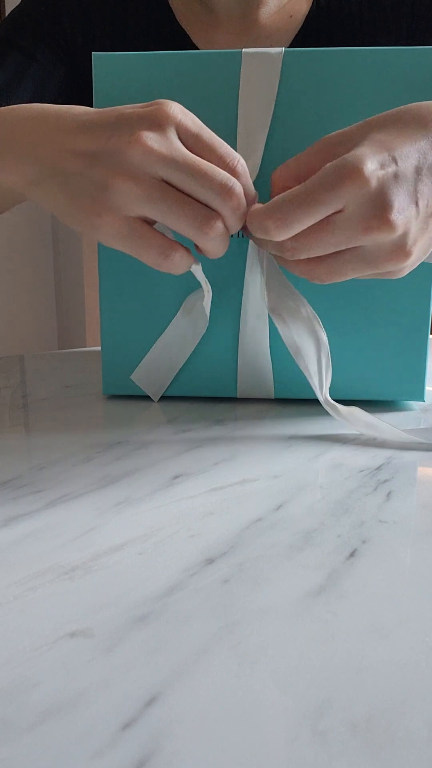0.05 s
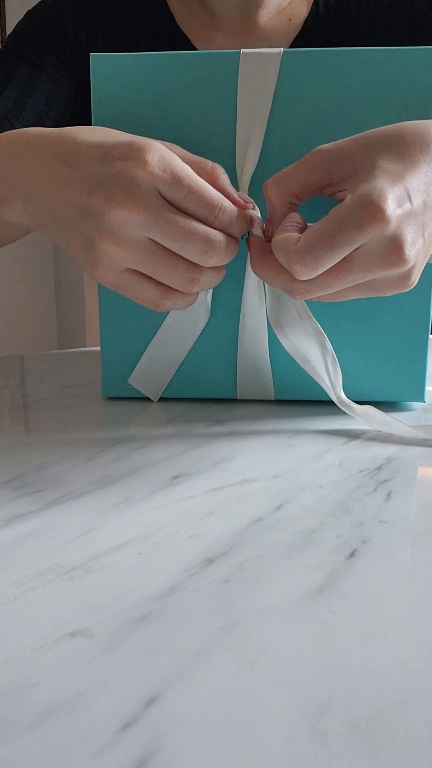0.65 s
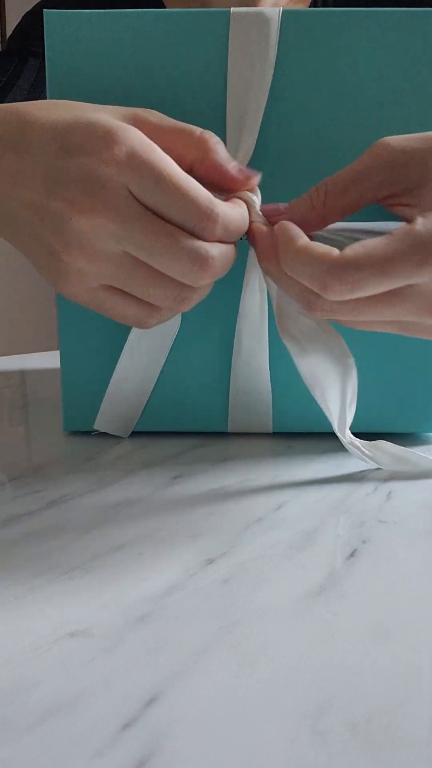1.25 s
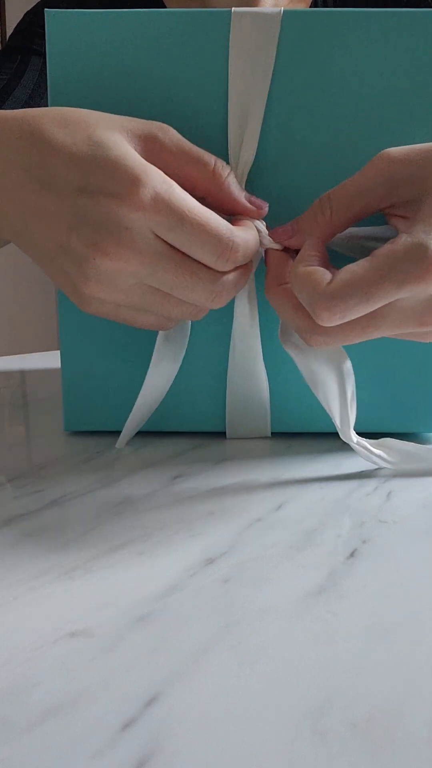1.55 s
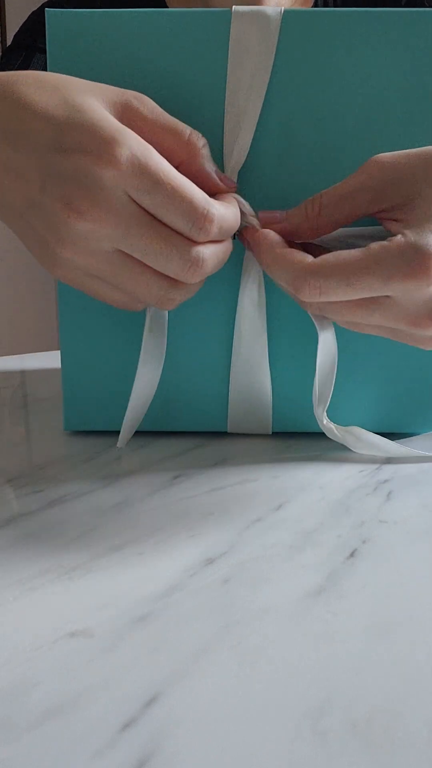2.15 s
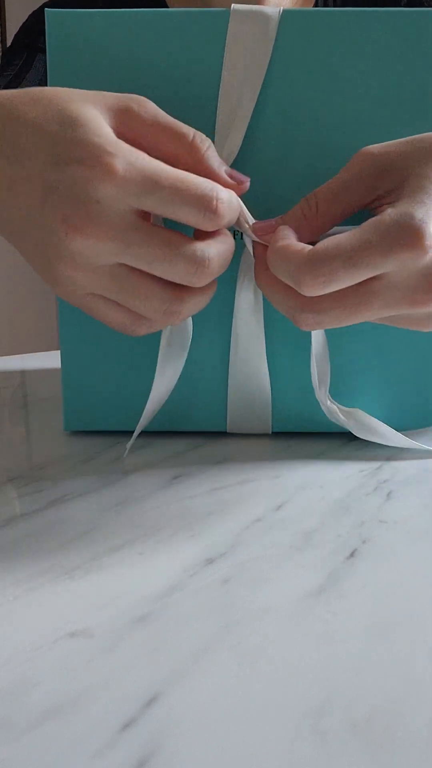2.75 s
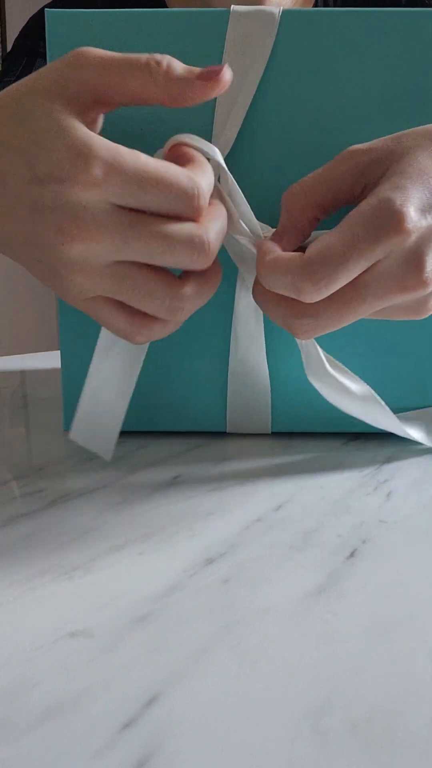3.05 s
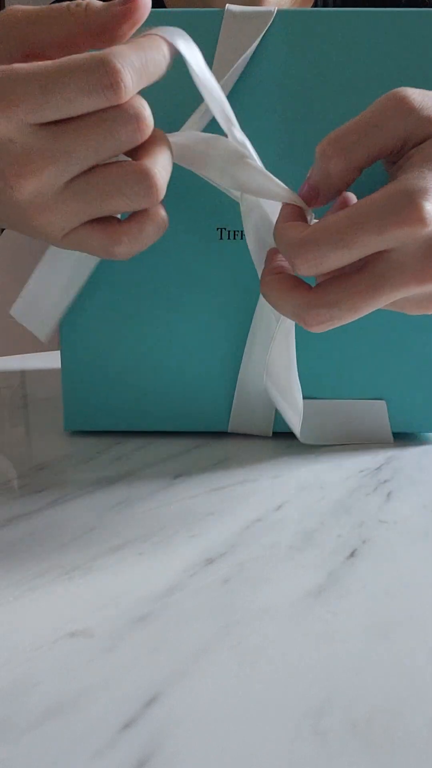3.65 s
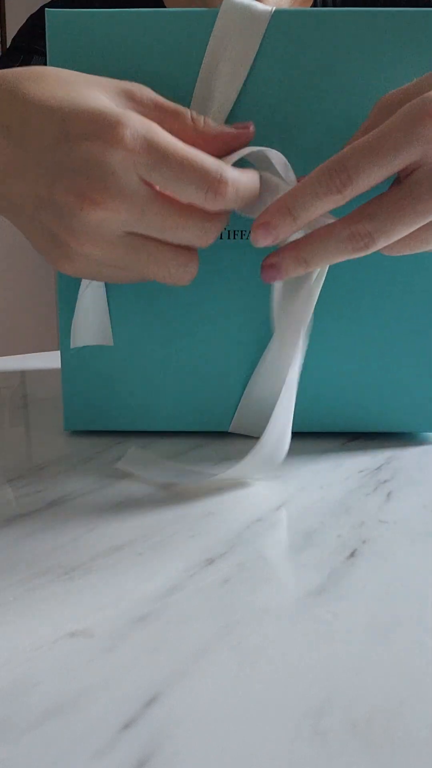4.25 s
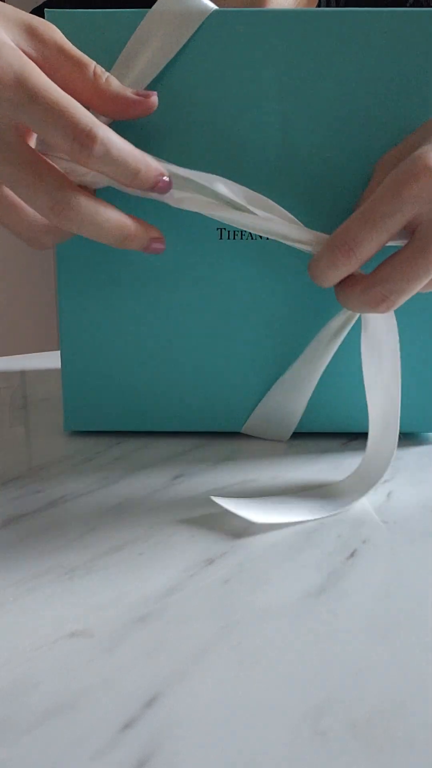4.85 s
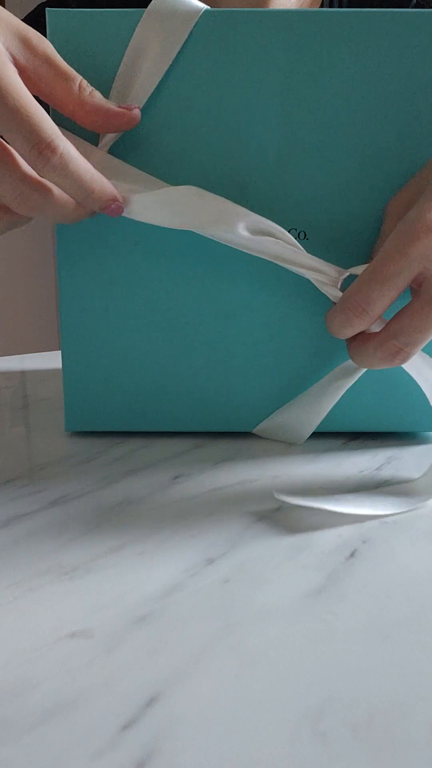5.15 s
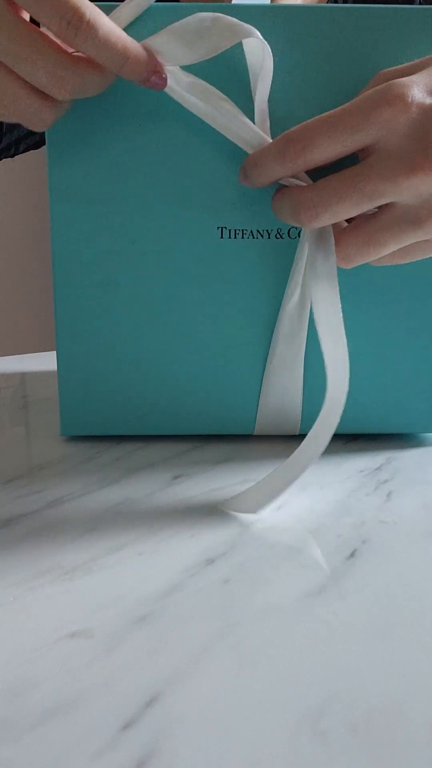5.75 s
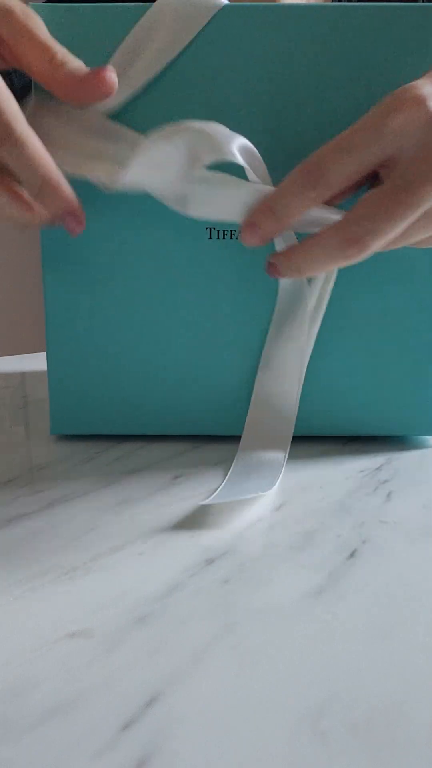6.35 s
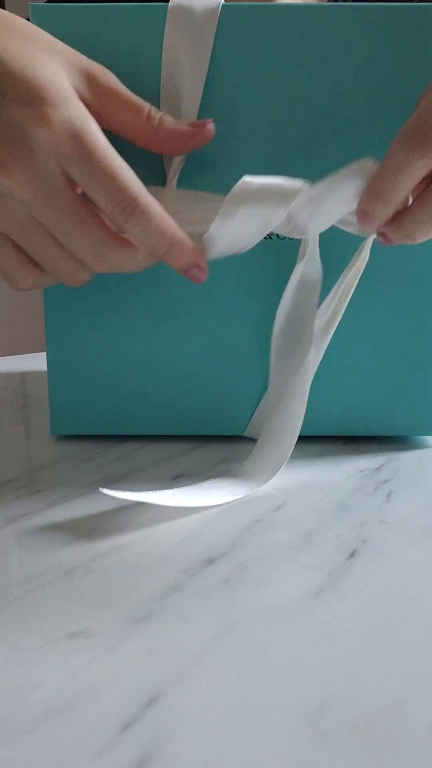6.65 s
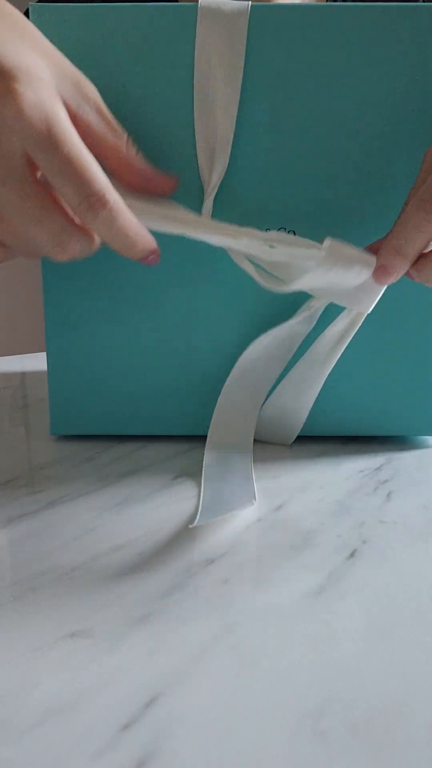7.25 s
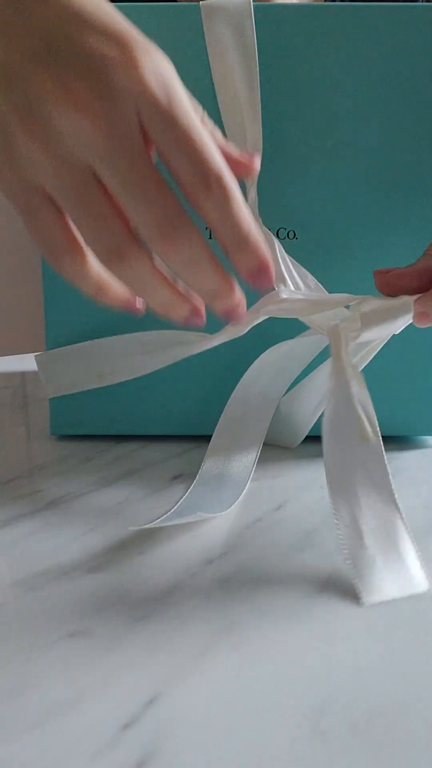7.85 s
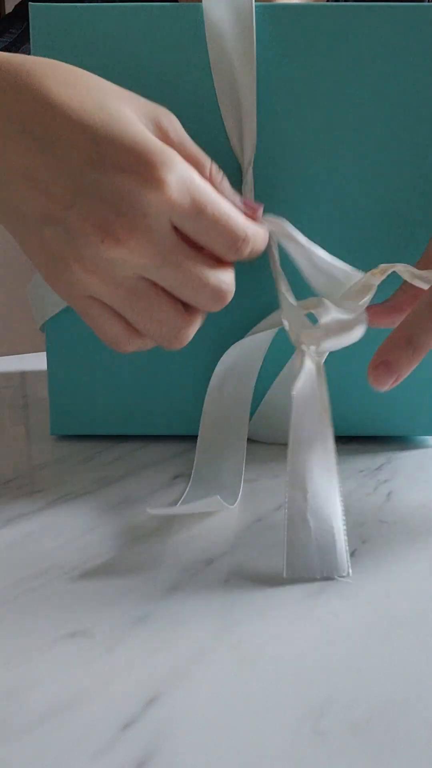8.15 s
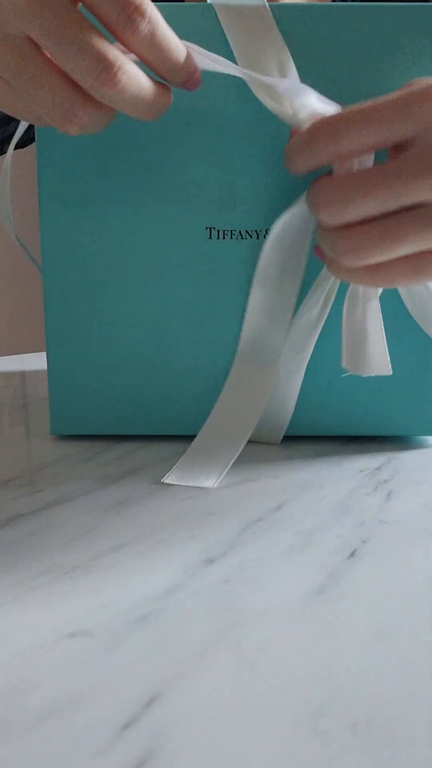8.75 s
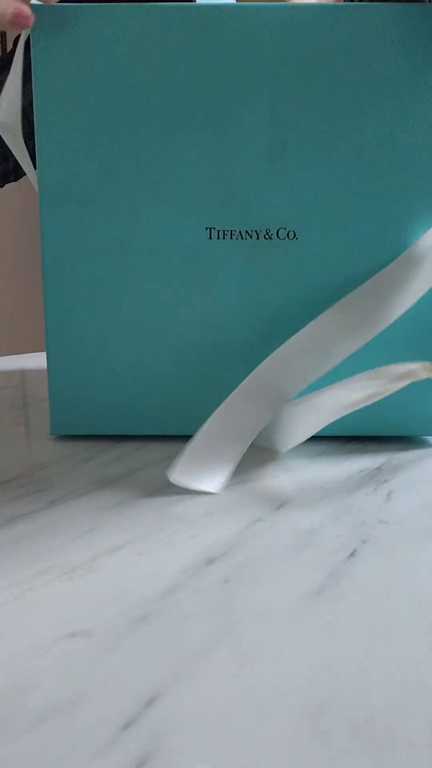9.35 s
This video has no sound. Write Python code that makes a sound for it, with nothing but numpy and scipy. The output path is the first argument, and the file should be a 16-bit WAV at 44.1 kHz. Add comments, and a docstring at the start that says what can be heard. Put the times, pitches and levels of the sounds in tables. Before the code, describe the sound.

A satin ribbon rustles and zips as it is untied, with light knocks and scuffs from a cardboard box over a soft fan.

```python
"""Untying a ribbon on a gift box

Fingers pick open the knot of a satin ribbon on a cardboard box that stands on a stone table in a
small room. Sliding friction makes the ribbon hiss and zip through the knot. Tugs and fingernails
excite the modes of the hollow box, which knocks, ticks and stutters; stick-slip motion makes it
scuff and creak. Behind it all a ventilation fan murmurs, broadband air noise with duct resonances."""
import sys
import numpy as np
from scipy import signal
from scipy.fft import rfft, irfft, next_fast_len
from scipy.io import wavfile

SR = 44100
rng = np.random.default_rng(int(sys.argv[2]) if len(sys.argv) > 2 else 0)


def to_wav(sig):
    """Store sig (one row per channel, or 1-D mono) as 16-bit WAV at the path in sys.argv[1].

    Samples outside -1..1 are clipped; the rate is SR.
    """
    pcm = np.clip(np.atleast_2d(sig), -1, 1) * 32767
    pcm = np.round(pcm).astype(np.int16)
    wavfile.write(sys.argv[1], SR, pcm.T)  # frames by channels


N = 418509


def from_db(db):
    """Amplitude ratio of a level in decibels."""
    return 10 ** (np.asarray(db) / 20)


def unit_rms(x):
    """Normalisation to an rms of 1."""
    return x / np.sqrt(np.mean(x ** 2) + 1e-20)


def at_hz(points, hz):
    """Linear interpolation of a spectrum over log frequency."""
    f, value = np.transpose(points)
    return np.interp(np.log(hz + 1e-3), np.log(f), value)


def shaped(x, gain_at):
    """Zero-phase filtering by a gain given as a function of frequency."""
    n = next_fast_len(x.shape[-1] + 256)
    hz = np.arange(n // 2 + 1) * SR / n
    return irfft(rfft(x, n) * gain_at(hz), n)[..., :x.shape[-1]]


def coloured(x, spectrum):
    """Spectral shaping by a table of gains, normalised to an rms of 1."""
    return unit_rms(shaped(x, lambda hz: from_db(at_hz(spectrum, hz))))


def bandpass(x, low_hz, high_hz, order=2):
    """Maximally flat band-pass filtering."""
    return signal.sosfilt(signal.butter(order, [low_hz, high_hz], "band", fs=SR, output="sos"), x)


def resonate(x, hz, width_hz):
    """Second-order resonance with unit gain at its peak."""
    r = np.exp(-np.pi * width_hz / SR)
    feedback = [1, -(1 + r * r) * np.cos(2 * np.pi * hz / SR), r * r]
    return signal.lfilter(np.array([1, 0, -1]) * (1 - r * r) / 2, feedback, x)


def drift(per_s):
    """Random modulation with an rms of 1, gliding to per_s new values a second."""
    count = int(N * per_s / SR) + 2
    values = rng.standard_normal(N // 8)[:count]
    return unit_rms(np.interp(np.arange(N) * per_s / SR, np.arange(count), values))


def swell(n, skew=0.5):
    """Half-sine envelope; a skew below 1 brings the peak forward."""
    return np.sin(np.pi * np.linspace(0, 1, n, endpoint=False) ** skew)


def add(track, s, sound):
    """Superposition of a sound on a track, starting at s seconds."""
    i = int(round(s * SR))
    track[..., i:i + sound.shape[-1]] += sound[..., :N - i]


# Correlation of left and right in the diffuse field: (frequency [Hz], correlation [ratio])
CORRELATION = [(60, 0.64), (130, 0.97), (290, 1), (640, 0.69), (1400, 0), (15000, 0.035)]

def diffuse(n):
    """Diffuse field: long waves reach both ears alike, short waves are uncorrelated."""
    mid, side = rng.standard_normal((2, n))
    mid = shaped(mid, lambda hz: np.sqrt(1 + at_hz(CORRELATION, hz)))
    side = shaped(side, lambda hz: np.sqrt(1 - at_hz(CORRELATION, hz)))
    return np.array([mid + side, mid - side])


# Spectrum of the rushing air: (frequency [Hz], relative level [dB])
AIR_SPECTRUM = [(25, -10), (45, -3), (70, -17), (105, -2.5), (198, -0.5), (509, -10.5), (804, -9.5),
                (1050, -14), (1400, -17.5), (2420, -23), (3530, -28.5), (4300, -24.5), (5900, -34),
                (15500, -37.5)]
# Resonances of the duct: (frequency [Hz], bandwidth [Hz], relative level [dB])
DUCT_MODES = [(209.2, 10.7, -56), (310, 100, -61.5), (625, 13.6, -65), (867, 5.8, -57.5), (2330, 165, -67)]

def fan(air_db=-49.0, waver_db=0.5, left_db=-1.5, right_db=1.0):
    """Flow noise: a nearly steady broadband rush, with narrow bands from duct resonance."""
    air = from_db(air_db + waver_db * drift(per_s=12)) * coloured(diffuse(N), AIR_SPECTRUM)
    flow = diffuse(N)
    duct = sum(from_db(db) * unit_rms(resonate(flow, hz, width_hz)) for hz, width_hz, db in DUCT_MODES)
    return (air + duct) * from_db([[left_db], [right_db]])


LEFT_LAG_SAMPLES = 14   # sound from the right reaches the left ear later
# Spectrum of the wall reflections: (frequency [Hz], relative level [dB])
WALL_SPECTRUM = [(60, 9), (200, 6), (500, -1.5), (1200, 1.5), (3000, 5), (8000, 10.5), (15000, 1.5)]

def room(x, near_db=-9.5, tail_db=-9.5, near_s=0.013, t60_s=0.58, gap_s=0.0037):
    """Reverberation: direct sound, a cluster of early reflections, then an exponential tail."""
    t = np.arange(SR // 2) / SR
    arrived = t > gap_s
    near = arrived / (1 + (t / near_s) ** 8)
    tail = arrived * from_db(-60 * t / t60_s)
    envelope = np.hypot(from_db(near_db) * unit_rms(near), from_db(tail_db) * unit_rms(tail))
    response = coloured(diffuse(len(t)), WALL_SPECTRUM) * envelope / np.sqrt(len(t))
    response[0, LEFT_LAG_SAMPLES] += 1
    response[1, 0] += 1
    return signal.fftconvolve(x[None], response, axes=1)[:, :N]


# Level difference between the ears: (frequency [Hz], right over left [dB])
EAR_DIFFERENCE = [(60, 2), (110, 4), (200, 1.5), (380, 1), (550, 6.5), (750, 9.5), (1050, 4), (1400, 9),
                  (2400, 6), (4400, 6.5), (8000, 1), (15000, 3.5)]

def to_the_right(x):
    """Interaural level difference: half is taken from the left ear, half given to the right."""
    return shaped(x, lambda hz: from_db(at_hz(EAR_DIFFERENCE, hz) * [[-.5], [.5]]))


# The hands tilt the box on the table: (time [s], duration [s], level [dB])
BOX_TILTS = [(0.564, 0.19, -51), (1.47, 0.11, -46), (1.915, 0.3, -49.5), (2.327, 0.19, -53),
             (4.147, 0.11, -48), (5.102, .035, -45.5), (6.597, .05, -49), (8.498, 0.12, -47)]

def rumble(force, push_db=-29.0, settle_s=0.012, exponent=0.6):
    """Forced vibration: low noise swells with each tilt and follows the rms force on the box."""
    r = np.exp(-1 / (settle_s * SR))
    push = np.sqrt(signal.lfilter([1 - r], [1, -r], force ** 2 + 1e-18))
    envelope = from_db(push_db) * push ** exponent
    for s, length, db in BOX_TILTS:
        add(envelope, s, from_db(db) * swell(int(length * SR)))
    return envelope * unit_rms(bandpass(rng.standard_normal(N), low_hz=66.4, high_hz=118.0))


# Hard tugs make the box stutter on the table: (time [s], thump level [dB], relative crack level [dB],
# panel frequency [Hz], hops [count], gap [s], loss per hop [dB])
STUTTERS = [(1.4872, -17.5, -35, 209, 2, 0.0091, 4), (1.5497, -15.5, -37, 240, 5, .0138, 1.0),
            (4.2484, -18, -29, 365, 3, 0.008, 2.5), (5.544, -16, -25.5, 224, 3, .0140, 2),
            (5.7836, -24.5, -37.5, 318, 3, 0.01025, 1.5), (5.8713, -26, -43, 245, 5, 0.015, 2),
            (9.072, -29, -31, 430, 3, 0.0071, 0)]

def hops(gap_spread=0.05):
    """Repeated impact: contacts at slightly uneven intervals, with a set loss from one to the next."""
    contacts = []
    for s, thump_db, edge_db, panel_hz, count, gap_s, loss_db in STUTTERS:
        for k in range(int(count)):
            contacts.append((s, thump_db - k * loss_db, edge_db - k * loss_db, panel_hz))
            s += gap_s * (1 + gap_spread * rng.standard_normal())
    return contacts


# Single blows on the box: (time [s], thump level [dB], relative crack level [dB], panel frequency [Hz])
BLOWS = [(0.603, -34.5, -43.5, 233), (1.416, -48, -43.5, 420), (1.539, -22, -42, 230),
         (1.815, -36, -48, 248), (1.911, -40, -39, 470), (2.346, -42, -47, 190), (3.2017, -23, -40.5, 210),
         (3.2598, -39, -35.5, 354), (3.2678, -31, -43, 268), (3.294, -26.5, -49, 229),
         (3.3395, -31, -42, 249), (4.170, -37.5, -48, 168), (4.2397, -10, -21.5, 232),
         (4.322, -30, -58, 235), (5.1086, -25, -24, 320), (5.432, -26.5, -36, 211),
         (5.485, -52, -37.5, 450), (5.6095, -53, -32, 300), (5.7598, -22, -38, 251),
         (5.946, -27.5, -40, 165), (6.278, -38, -36, 450), (6.4823, -25, -30.5, 359),
         (6.6172, -20.5, -30.5, 387), (7.886, -51, -43.5, 217), (8.012, -53, -47, 450)]
# Spectrum of the crack from the card's edge: (frequency [Hz], relative level [dB])
CRACK_SPECTRUM = [(60, -39), (200, -38), (500, 7), (1050, 4), (1550, -3.5), (2000, -8.5), (2750, -3),
                  (3500, -20.5), (4600, -5), (6500, -25), (9500, -26), (15000, -35)]

def knocks(crack_s=0.0053, crack_db=-1.0, ring_db=-9.5, t60_s=0.059, crest_s=0.0012, n=8192):
    """Impact excitation: a blow or hop heaves a panel, sets it ringing and cracks at the card's edge."""
    force, t = np.zeros(N), np.arange(n) / SR
    for s, thump_db, edge_db, panel_hz in list(BLOWS) + hops():
        # a smaller, stiffer panel gives a higher thump
        heave = bandpass(signal.unit_impulse(n), 0.52 * panel_hz, 1.836 * panel_hz, order=3)
        envelope = np.minimum(t / crest_s, 1) * from_db(-60 * t / t60_s)
        ring = np.cos(2 * np.pi * panel_hz * (t - crest_s)) * envelope
        thump = from_db(ring_db) * ring - heave / np.abs(heave).max()
        crack = coloured(rng.standard_normal(n), CRACK_SPECTRUM) * np.exp(-t / crack_s)
        add(force, s, from_db(thump_db) * thump + from_db(edge_db + crack_db) * crack)
    return force


# The box drags on the table: (time [s], duration [s], relative level [dB], upper band edge [Hz])
DRAGS = [(1.952, 0.2, -44.5, 480), (2.958, 0.098, -46.5, 770), (3.252, 0.053, -39, 980),
         (4.77, .021, -46.5, 2480), (5.477, 0.041, -47.5, 1630), (5.68, .068, -40, 1710),
         (5.774, 0.046, -33.5, 1260), (5.852, .12, -37.5, 970), (6.044, 0.053, -46.5, 1880),
         (6.329, 0.03, -44, 2120), (6.505, 0.027, -39.5, 2160)]

def scuffs(slips_per_s=750.0, low_hz=151.0, grit=0.06, gain_db=-1.0, slide_s=0.18, slide_db=-24):
    """Irregular stick-slip: card drags alone or with a stutter; a faster drag is brighter."""
    force = np.zeros(N)
    slips = (rng.random(N) < slips_per_s / SR) * rng.uniform(0.35, 1, N)
    slips += grit * rng.standard_normal(N)
    slides = [(s, slide_s, db + slide_db, 1.79 * panel_hz) for s, db, _, panel_hz, *_ in STUTTERS]
    for s, length, db, high_hz in list(DRAGS) + slides:
        i, n = int(s * SR), int(length * SR)
        drag = unit_rms(bandpass(slips[i:i + n], low_hz, high_hz))
        add(force, s, from_db(db + gain_db) * drag * swell(n, skew=0.78))
    return force


# The taut ribbon creaks over an edge of the box: (time [s], duration [s], level [dB], resonance [Hz])
EDGE_CREAKS = [(1.554, 0.063, -38, 1140), (3.257, 0.023, -50, 1600), (4.25, 0.028, -27.5, 960),
               (4.253, 0.034, -38, 2680), (5.702, 0.038, -45.5, 1360), (6.398, 0.032, -46.5, 2110),
               (6.48, .045, -54, 1490), (9.07, 0.04, -35, 1750)]

def creaks(slips_per_s=385, jitter=0.04, uneven_db=7.0, relative_width=0.65):
    """Periodic stick-slip: under tension a nearly regular pulse train drives a resonance of the card."""
    force = np.zeros(N)
    slip_rate = slips_per_s * (1 + jitter * drift(per_s=200))
    strength = from_db(uneven_db * drift(per_s=200))
    for s, length, db, hz in EDGE_CREAKS:
        i, n, width_hz = int(s * SR), int(length * SR), relative_width * hz
        slip_count = np.floor(np.cumsum(slip_rate[i:i + n]) / SR)
        slips = np.diff(slip_count, prepend=-1) * strength[i:i + n]
        creak = unit_rms(resonate(resonate(slips, hz, width_hz), hz, width_hz))
        add(force, s, from_db(db) * creak * swell(n, skew=0.58))
    return force


# Modes of the panels and the enclosed air: (frequency [Hz], relative level [dB], 60 dB decay time [s])
BOX_MODES = [(166, -26, 0.36), (208.5, -17.5, 0.19), (244, -21, 0.073), (345, -22.5, 0.12),
             (410.4, -22, 0.16), (555.5, -21, 0.19), (677, -49, 0.1), (894, -14.5, 0.1),
             (1025, -10.5, 0.042), (1185, -15.5, 0.035), (1397, -11, 0.032), (1980, -22, 0.062),
             (2144, -21, 0.11), (2440, -31, 0.086), (2900, -29, 0.038)]

def box(force, ring_db=-29.5, spot_db=2.0, spots_per_s=12.0):
    """Modal response: the panels yield at once, then each mode rings as the touched spot allows."""
    out = force.copy()
    for hz, db, t60_s in BOX_MODES:
        r, w = from_db(-60 / (t60_s * SR)), 2 * np.pi * hz / SR
        drive = force * from_db(spot_db * drift(spots_per_s))
        mode = signal.lfilter([1, -r * np.cos(w)], [1, -2 * r * np.cos(w), r * r], drive + 1e-18)
        out += from_db(db + ring_db) * mode
    return out


def sliding_noise(direct_db):
    """Scattering: part of the noise comes straight from the right, part by way of hands, box and table."""
    direct = from_db(direct_db) * rng.standard_normal(N)
    return diffuse(N) + np.array([np.roll(direct, LEFT_LAG_SAMPLES), direct])


# Contour of the fingers' restless rustle: (time [s], level before centring and expansion [dB])
FINGER_RUSTLE = [(0.0, -76), (0.32, -73.5), (1.53, -64.5), (1.72, -68), (2.64, -73), (3.57, -63),
                 (3.86, -65), (4.57, -64.5), (4.76, -63.5), (4.97, -63), (5.84, -62.5), (7.24, -67),
                 (7.5, -65.5), (7.88, -69), (8.96, -63.5), (9.04, -61.5), (9.17, -66.5), (9.49, -69.5)]
# Ribbon is drawn over knot and card: (time [s], duration [s], rub level [dB], sheen level [dB])
RIBBON_PULLS = [(0.49, .14, -62, -65), (0.81, 0.073, -57, -59.5), (1.048, .08, -59.5, -61),
                (1.494, 0.18, -55, -59), (1.89, 0.11, -60, -60), (2.654, 0.14, -72, -60.5),
                (2.846, 0.25, -57, -56.5), (3.28, .13, -58, -58), (3.49, 0.24, -55, -54),
                (4.04, 0.16, -56, -58), (4.237, 0.06, -46.5, -52), (4.548, 0.32, -56.5, -52.5),
                (4.753, 0.2, -52, -51.5), (5.096, 0.059, -50, -47), (5.489, 0.13, -48, -50),
                (5.797, 0.27, -51.5, -54.5), (6.20, 0.1, -55.5, -54), (6.38, 0.11, -53, -53),
                (6.633, 0.15, -59.5, -58), (6.835, 0.31, -59.5, -59.5), (7.246, 0.18, -55, -54.5),
                (7.41, 0.049, -52, -53), (7.479, 0.03, -55, -58), (7.572, 0.065, -67, -58),
                (8.079, 0.087, -57.5, -55), (8.274, 0.23, -56.5, -58), (8.515, 0.2, -57, -59),
                (8.86, 0.39, -55, -50.5)]

def sliding_envelopes(rest_rub_db=-63.5, rest_sheen_db=-65.0, expansion=1.34, flick_db=2.0):
    """Incoherent addition: in both rub and sheen, each pull adds its power to the fingers' rustle."""
    times, levels = np.transpose(FINGER_RUSTLE)
    busy_db = expansion * np.interp(np.arange(N) / SR, times, levels - levels.mean())
    busy_db += flick_db * drift(per_s=14)
    power = from_db(busy_db + np.array([[rest_rub_db], [rest_sheen_db]])) ** 2
    for s, length, rub_db, sheen_db in RIBBON_PULLS:
        pull = swell(int(length * SR), skew=0.86)   # gathers speed a little faster than it loses it
        add(power, s, (from_db([[rub_db], [sheen_db]]) * pull) ** 2)
    return np.sqrt(power)


def folds(x, depth=0.25, shifts_per_s=16.0, relative_width=0.16):
    """Time-varying filtering: folds of the cloth open and close, each lifting or hollowing a band."""
    bands = (resonate(x, hz, relative_width * hz) for hz in np.geomspace(3110, 13700, 7))
    return x + sum(depth * drift(shifts_per_s) * band for band in bands)


# The ribbon jerks through the knot:
# (time [s], duration [s], relative level [dB], centre frequency [Hz], bandwidth [Hz])
KNOT_ZIPS = [(0.929, .004, -48, 6000, 8000), (1.414, .003, -43, 4550, 8000),
             (2.985, 0.069, -48.5, 5440, 1400), (3.604, 0.0087, -44, 3300, 6000),
             (4.039, .05, -49, 5970, 2300), (4.692, .012, -35, 7500, 5530),
             (4.825, .014, -47.5, 6600, 6000), (4.845, .013, -42, 6600, 6000),
             (4.882, .017, -41, 7000, 6000), (4.905, 0.013, -42, 6600, 6000),
             (5.001, 0.017, -38.5, 6600, 5560), (5.1086, 0.0034, -20, 4900, 2600),
             (5.122, .027, -43.5, 5560, 4500), (5.547, 0.021, -47, 4500, 5000),
             (5.841, 0.013, -35.5, 3330, 5000), (6.400, .03, -50, 7350, 6000),
             (7.420, .013, -44, 6500, 6000), (7.485, .025, -52, 13500, 4000),
             (7.737, 0.0055, -46.5, 4170, 1500), (7.893, .005, -48, 6030, 7000),
             (8.868, 0.2, -51.5, 5570, 1800), (9.071, .03, -43, 3800, 4000)]

def zips(gain_db=-1.0):
    """Transient friction: threads rattle over each other in a band of noise as the knot gives."""
    out, threads = np.zeros((2, N)), sliding_noise(direct_db=-14)
    for s, length, db, hz, width_hz in KNOT_ZIPS:
        i, n = int(s * SR), int(length * SR)
        wide = resonate(threads[:, i:i + n], hz, width_hz)
        narrow = resonate(wide, hz, width_hz)
        rasp = unit_rms(unit_rms(narrow) + unit_rms(wide))
        add(out, s, from_db(db + gain_db) * rasp * swell(n, skew=0.64))
    return out


# Spectrum of the satin's rub: (frequency [Hz], relative level [dB])
RUB_SPECTRUM = [(900, -9), (1800, -6.5), (2600, 1), (3500, -4.5), (4400, -2), (5600, -3), (7000, -4.5),
                (8200, -3), (9500, -30), (15000, -15.5)]
# Spectrum of the sheen, the high hiss of the weave: (frequency [Hz], relative level [dB])
SHEEN_SPECTRUM = [(4000, -25), (8000, -2), (9300, -5.5), (12000, 2.5), (15800, -3.5)]

def ribbon(direct_db=-9.0, catch_db=2.0, grain_db=1.5, twist_db=1.2, snaps_per_s=20.0, tick_s=0.0013):
    """Sliding friction: tiny grains of noise bunch as the satin catches; threads snap free and tick."""
    rub_envelope, sheen_envelope = sliding_envelopes()
    grip = from_db(catch_db * drift(per_s=90) + grain_db * drift(per_s=1800))
    snaps = (rng.random(N) < snaps_per_s / SR) * rng.uniform(0.62, 0.68, N)
    ticks = signal.lfilter([1.8], [1, -np.exp(-1 / (tick_s * SR))], snaps + 1e-18)
    rub = coloured(sliding_noise(direct_db) * (grip + ticks), RUB_SPECTRUM)
    sheen = coloured(sliding_noise(direct_db) * (grip + ticks), SHEEN_SPECTRUM)
    twist = from_db(twist_db * drift(per_s=25))   # the glossy face turns in and out of contact
    return rub_envelope * rub + sheen_envelope * twist * sheen


def scene():
    """Superposition: box and ribbon a little to the right, the fan all around."""
    force = knocks() + scuffs() + creaks()
    card = room(box(force) + rumble(force))
    satin = folds(ribbon()) + zips()
    return to_the_right(card + satin) + fan()


def record(dry, bass_cut_hz=68.0, top_cut_hz=15900):
    """Band limiting: small microphones lose the deep bass, and the top is cut steeply."""
    thin = signal.sosfilt(signal.butter(2, bass_cut_hz, "high", fs=SR, output="sos"), dry)
    return signal.sosfilt(signal.ellip(12, .1, 80, top_cut_hz, fs=SR, output="sos"), thin)


dry = scene()
out = record(dry)
to_wav(out)
```